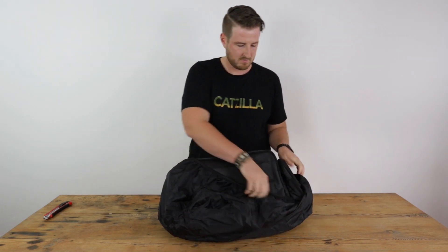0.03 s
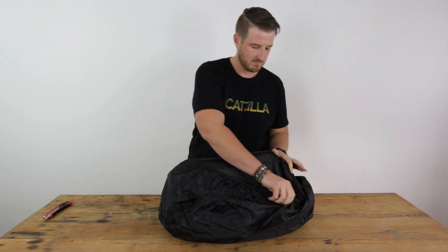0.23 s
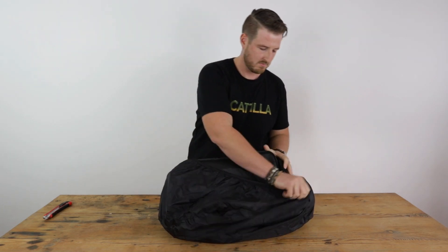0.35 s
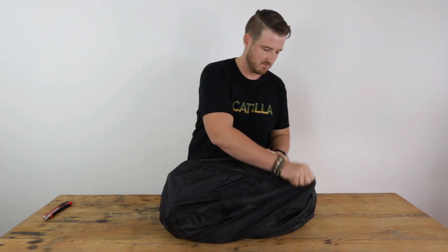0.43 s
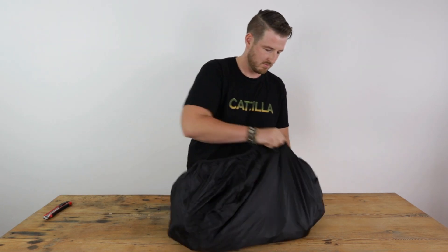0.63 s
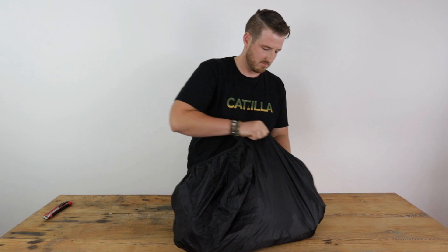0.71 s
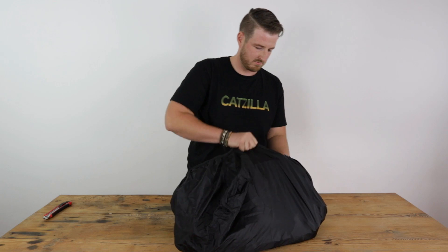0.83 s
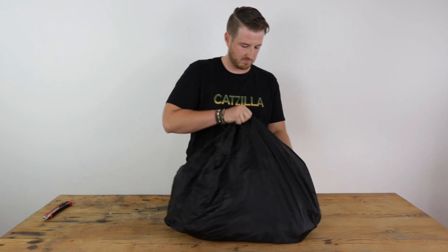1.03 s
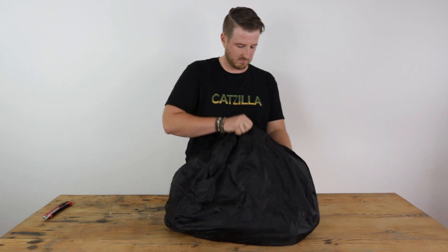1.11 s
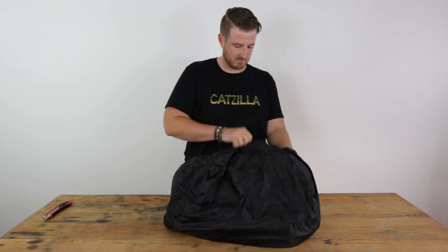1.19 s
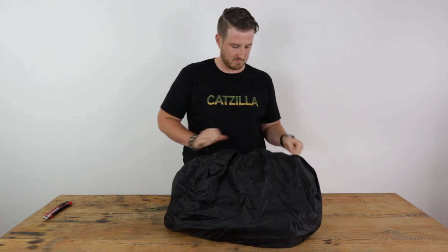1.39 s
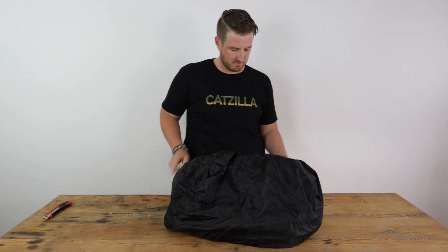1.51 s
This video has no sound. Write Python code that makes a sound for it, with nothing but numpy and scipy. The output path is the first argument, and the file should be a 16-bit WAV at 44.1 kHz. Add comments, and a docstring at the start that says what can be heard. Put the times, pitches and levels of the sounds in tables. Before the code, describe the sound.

A coated fabric cover rustles and swishes over a soft bag, with one sharp taut thump

```python
"""A coated fabric cover slides over a soft bag on a wooden table, pulled by hand in a quiet room. Sliding and
folding are random grains in noise, filtered into bands; the bag's rumble is banded noise alone. Creases snap,
the bag thuds and a small hard part tinks as struck resonators; taut cloth creaks as gliding sines. One jerk
pulls the cloth taut: a thump of ringing modes with a bright noise crack. A tail of dying noise is the room, and
faint banded noise its stillness."""
import sys
import numpy as np
from scipy import signal
from scipy.io import wavfile

SR = 44100
rng = np.random.default_rng(int(sys.argv[2]) if len(sys.argv) > 2 else 0)


def transcribe(signal):
    """Save signal, clipped to [-1, 1], as a 16-bit WAV file at the path in sys.argv[1]."""
    frames = np.atleast_2d(signal).T
    limited = np.clip(frames, -1, 1)
    pcm = np.round(limited * 32767).astype(np.int16)
    wavfile.write(sys.argv[1], SR, pcm)


N = 68355  # samples


def amp(db):
    """Level to amplitude ratio: 20 dB is a factor of ten."""
    return 10 ** (np.asarray(db) / 20)


def rms_one(x):
    """Normalise the effective value: scale to rms 1."""
    return x / np.sqrt(np.mean(x ** 2) + 1e-20)


def in_time(rows):
    """Envelope by linear interpolation: each column after the time column, sample by sample."""
    time_s, *columns = np.transpose(rows)
    return [np.interp(np.arange(N) / SR, time_s, column) for column in columns]


def soft(x, cutoff_hz):
    """One-pole low-pass: exponential smoothing rounds off abrupt forces."""
    pole = np.exp(-2 * np.pi * cutoff_hz / SR)
    return signal.lfilter([1 - pole], [1, -pole], x)


def thin(x, cutoff_hz):
    """Second-order high-pass: attenuation below the cutoff."""
    return signal.sosfilt(signal.butter(2, cutoff_hz, "high", fs=SR, output="sos"), x)


def drift(rate_hz):
    """Low-passed Gaussian noise: a slow random modulation of rms 1."""
    step = 40  # samples between computed values
    settling = 2000  # values dropped while the filter settles
    pole = np.exp(-2 * np.pi * step * rate_hz / SR)
    noise = rng.standard_normal(N // step + settling + 2)
    slow = signal.lfilter([1], [1, -2 * pole, pole * pole], noise)[settling:]
    return np.interp(np.arange(N) / step, np.arange(len(slow)), rms_one(slow))


def click(time_s, level_db):
    """Impulsive excitation: single-sample clicks at given times."""
    out = np.zeros(N)
    out[(np.atleast_1d(time_s) * SR).astype(int)] = amp(level_db)
    return out


def ring(excitation, pitch_hz, t60_s):
    """Damped resonator: a unit click starts a decaying sine of initial height 1."""
    pole = amp(-60 / (t60_s * SR))
    angle = 2 * np.pi * pitch_hz / SR
    feedback = [1, -2 * pole * np.cos(angle), pole * pole]
    return signal.lfilter([0, np.sin(angle)], feedback, excitation + 1e-18)


def grains(rate_per_s, spread_db, share):
    """Shot noise: uneven random clicks, mirrored in two rows, with a share of power; the rest is separate noise."""
    sizes = amp(spread_db * np.minimum(rng.exponential(1, N), 5)) * rng.choice([-1, 1], N)
    happens = rng.random(N) < rate_per_s / SR
    clicks = rms_one(sizes * happens) * [[1], [-1]]
    share = np.clip(share, 0, 1)
    return np.sqrt(share) * clicks + np.sqrt(1 - share) * rng.standard_normal((2, N))


def banded(source, spectrum, patchy_db, rate_hz, top_db=0):
    """Subtractive synthesis in flickering quarter-octave bands, the highest following top_db; rms 1."""
    sheen_from_hz, sheen_full_hz = 4900, 11700
    hz, density_db = np.transpose(spectrum)
    edges = hz[0] * 2 ** np.arange(0, np.log2(hz[-1] / hz[0]), 1 / 4)
    out = 0
    together = drift(rate_hz)  # flicker common to all bands
    for k, (low, high) in enumerate(zip(edges, edges[1:])):
        band_pass = signal.butter(2, [low, min(high, .45 * SR)], "band", fs=SR, output="sos")
        band = signal.sosfilt(band_pass, source[k % 2])  # neighbours take alternate rows
        log_mid = np.log(low * high) / 2
        top_share = np.interp(log_mid, np.log([sheen_from_hz, sheen_full_hz]), [0, 1])
        level_db = np.interp(log_mid, np.log(hz), density_db) + top_share * top_db
        flicker_db = patchy_db * (0.51 * together + drift(rate_hz))
        out = out + band * amp(level_db + flicker_db)
    return rms_one(out)


def slide():
    """Sliding friction: dense small slips make a bright swish with changing sheen."""
    # Strength of the sliding; sheen is relative weight of the top: [time_s, level_db, sheen_db]
    slide_curve = [(0, -31.5, -13), (.12, -31.5, -5.5), (.165, -32.5, -9.5), (.19, -32, 1),
                   (.228, -29.5, -1), (.28, -33.5, -6.5), (.32, -31, 0), (.358, -26, 3.5),
                   (.375, -30.5, -4.5), (.436, -27.5, -6.5), (.48, -28.5, -6), (.638, -20.5, -1),
                   (.724, -18.5, -4), (.742, -25, 0.5), (.846, -24, -6), (.914, -29.5, -6),
                   (.975, -17, -3.5), (1.06, -20.5, -1.5), (1.1, -21.5, -7), (1.204, -26, 2.5),
                   (1.328, -32, -7), (1.41, -36, -3.5), (1.45, -40, -8.5), (1.55, -45, -8)]
    # Relative spectral density of the swish: [frequency_hz, density_db]
    swish_spectrum = [(800, -25), (1200, -1), (2100, -2.5), (4000, -4), (6500, -4.5), (8400, -2),
                      (10600, -10.5), (13000, -8), (16000, -4)]
    level_db, sheen_db = in_time(slide_curve)
    slips = grains(rate_per_s=5000, spread_db=0.5, share=0.56)
    return amp(level_db) * banded(slips, swish_spectrum, patchy_db=0.62, rate_hz=19, top_db=sheen_db)


def crumple():
    """Crackling noise: sparser, more uneven grains as creases fold, duller than the slide."""
    # Strength of the folding: [time_s, level_db]
    crumple_curve = [(0, -35), (.17, -38), (.23, -37.5), (.3, -37.5), (.4, -36), (.445, -26.5),
                     (.52, -28.5), (.7, -26.5), (.76, -28.5), (.86, -26.5), (.92, -33.5), (.97, -26.5),
                     (1.1, -29), (1.17, -28), (1.3, -35), (1.42, -44), (1.55, -52)]
    # Relative spectral density of the folding: [frequency_hz, density_db]
    fold_spectrum = [(210, -21), (350, -7.5), (450, 2), (1060, 3), (1410, -9.5), (1610, -5.5), (2600, -6),
                     (3380, -76)]
    folds = grains(rate_per_s=1100, spread_db=3.0, share=.55)
    return amp(in_time(crumple_curve)[0]) * banded(folds, fold_spectrum, patchy_db=0.43, rate_hz=24)


def bag_rumble():
    """Broadband excitation of a soft body: low filtered noise as the bag shifts."""
    # Strength of the shifting: [time_s, level_db]
    shift_curve = [(0.0, -43.5), (0.21, -44.5), (0.478, -38), (0.638, -29.5), (0.72, -30), (0.76, -33),
                   (1.026, -36), (1.2, -38), (1.3, -41.5), (1.42, -51.5), (1.55, -54)]
    # Relative spectral density of the rumble: [frequency_hz, density_db]
    bag_spectrum = [(15, -51), (25, -13), (48, -11), (108, -16), (156, 0.5), (211, 5), (343, 1.5),
                    (500, -6.5), (650, -45)]
    rumble = banded(rng.standard_normal((2, N)), bag_spectrum, patchy_db=2.1, rate_hz=12.0)
    return amp(in_time(shift_curve)[0]) * rumble


def thump():
    """Modal response: a jerk and its rebound ring the taut cover, with a short bright crack of noise."""
    # Modes the jerk swings inward: [frequency_hz, level_db, t60_s]
    jerk_modes = [(410, -15, .03), (530, -6, .05), (700, -6.5, .03), (950, -8, .01), (2600, -9, .01)]
    # Deep modes the rebound swings outward: [frequency_hz, level_db, t60_s]
    rebound_modes = [(270, -5, .065), (312, -12, .12)]
    jerk_s, rebound_lag_s = .7253, .0005
    push_db, push_soft_hz = -1.5, 1320  # click level before smoothing, and its low-pass
    crack_db, crack_t60_s, crack_rise_hz = -6, 0.016, 500  # level before the rise is smoothed
    jerk = soft(click(jerk_s, push_db), push_soft_hz)
    rebound = soft(click(jerk_s + rebound_lag_s, push_db), push_soft_hz)
    body = 0
    for push, modes in [(-jerk, jerk_modes), (rebound, rebound_modes)]:
        for hz, db, t60_s in modes:
            body = body + amp(db) * ring(push, hz, t60_s)
    crack_start = click(jerk_s - rebound_lag_s, crack_db)  # just ahead of the jerk
    fade = signal.lfilter([1], [1, -amp(-60 / (crack_t60_s * SR))], crack_start)
    white = rng.standard_normal(N)
    bright = rms_one(ring(white, pitch_hz=8500, t60_s=.0012))
    return body + soft(fade, crack_rise_hz) * (1.4 * soft(white, 6000) + 0.75 * bright)


def snaps():
    """Snap-through buckling: each crease flips with a short ring and a bright tick."""
    # Single creases; cue precedes the sound by the lag: [cue_s, peak_db, pitch_hz, tick_db]
    crease_flips = [(.0195, -17, 950, -30), (0.046, -12, 1900, -17), (0.0896, -19, 2620, -14),
                    (0.142, -24, 3200, -21), (.224, -22, 2900, -18), (0.2424, -15, 960, -20),
                    (.362, -14, 1300, -8), (.402, -16, 1770, -22), (0.4368, -11, 950, -11),
                    (.4525, -16, 2500, -12), (0.578, -14, 2120, -10), (0.64, -15, 1100, -10),
                    (.979, -9, 2480, -11), (1.464, -28, 1650, -31), (1.474, -26, 2250, -29)]
    lag_s, ring_cycles = 0.00145, 9.0  # cycles until 60 dB down
    cue_s, _, _, tick_db = np.transpose(crease_flips)
    out = -ring(click(cue_s + lag_s, tick_db), pitch_hz=2900, t60_s=0.0016)
    for start_s, peak_db, pitch_hz, _ in crease_flips:
        out -= ring(click(start_s + lag_s, peak_db), pitch_hz, ring_cycles / pitch_hz)
    return out


def thuds():
    """Forced damped resonance: smooth but rough-grained pushes ring low as the bag settles."""
    # Pushes, with level before smoothing: [start_s, push_db, pitch_hz]
    bag_pushes = [(0.089, -17.5, 210), (0.159, -24.5, 215), (.455, -19.5, 244), (0.509, -18.5, 197),
                  (.782, -11, 295), (.812, -10.5, 602), (.824, -21, 240), (1.017, -21, 245),
                  (1.045, -15, 530), (1.075, -24, 200), (1.146, -16, 726), (1.175, -14, 420),
                  (1.282, -29, 222)]
    t60_s, soft_hz, roughness = .05, 500, 0.37
    rough = 1 + roughness * rms_one(soft(rng.standard_normal(N), 600))
    out = 0
    for start_s, push_db, pitch_hz in bag_pushes:
        push = soft(soft(click(start_s, push_db), soft_hz), soft_hz)
        out = out + ring(rough * push, pitch_hz, t60_s)
    return out


def creaks():
    """Frequency modulation: taut cloth sounds a gliding, wavering tone that swells and fades."""
    # Creaks, level before flutter: [start_s, length_s, first_pitch_hz, last_pitch_hz, level_db]
    creak_glides = [(0.049, .028, 1747, 1830, -37), (.196, 0.045, 1000, 1186, -32),
                    (0.741, 0.0254, 780, 894, -23.5), (0.837, 0.026, 855, 1010, -32.5),
                    (1.288, 0.04, 1500, 1426, -35.5)]
    t = np.arange(N) / SR
    waver = 1 + 0.021 * drift(88)  # pitch ratio
    flutter_db = 1 * drift(70)
    out = 0
    for start_s, length_s, from_hz, to_hz, level_db in creak_glides:
        part = np.clip((t - start_s) / length_s, 0, 1)
        pitch_hz = (from_hz + (to_hz - from_hz) * part) * waver
        turns = np.cumsum(pitch_hz) / SR
        swell = np.sqrt(np.abs(np.sin(np.pi * part)))
        out = out + amp(level_db) * np.sin(2 * np.pi * turns) * swell
    return out * amp(flutter_db)


def tinks():
    """Modal synthesis: a small hard part knocks twice, ringing its modes."""
    # Knocks: [start_s, strike_db]
    knocks = [(1.5069, -31), (1.512, -26.5)]
    # Modes of the part, level relative to the strike: [frequency_hz, level_db, t60_s]
    part_modes = [(7520, -7.5, 0.026), (7900, -8.5, .025), (12900, -15, 0.013), (1060, -10, 0.027)]
    start_s, strike_db = np.transpose(knocks)
    return sum(ring(click(start_s, strike_db + db), hz, t60_s) for hz, db, t60_s in part_modes)


def room(x):
    """Reverberation by convolution: a diffuse tail of exponentially dying noise."""
    t60_s, tail_db = .4, -15
    t = np.arange(int(t60_s * SR)) / SR
    delayed = t > .006  # silence ahead of the tail
    tail = rng.standard_normal(len(t)) * amp(-60 * t / t60_s) * delayed
    unit_tail = tail / np.sqrt(np.sum(tail ** 2))
    return signal.fftconvolve(x, amp(tail_db) * unit_tail)[:N]


def still_room():
    """Background noise floor: faint low noise with unsteady bands."""
    # Relative spectral density of the still room: [frequency_hz, density_db]
    hush_spectrum = [(25, -4), (60, -5), (120, -6), (300, -12)]
    level_db = -63
    return amp(level_db) * banded(rng.standard_normal((2, N)), hush_spectrum, patchy_db=-5.0, rate_hz=6)


def scene():
    """Superposition of sources: knocks lose deep bass, and both channels carry the same signal."""
    mic_cut_hz, thump_cut_hz = 153, 88
    cloth = slide() + crumple() + bag_rumble()
    small = thin(snaps() + thuds() + creaks() + tinks(), mic_cut_hz)
    jerk = thin(thump(), thump_cut_hz)
    echo = thin(room(small + jerk), mic_cut_hz)
    return np.tile(cloth + small + jerk + echo + still_room(), (2, 1))


def record(dry):
    """Saturation and band-limiting: overload clips, then a steep low-pass cuts the top."""
    ceiling, cutoff_hz = .96, 15720
    low_pass = signal.ellip(14, .3, 75, cutoff_hz, fs=SR, output="sos")
    return signal.sosfilt(low_pass, np.clip(dry, -ceiling, ceiling))


dry = scene()
out = record(dry)
transcribe(out)
```